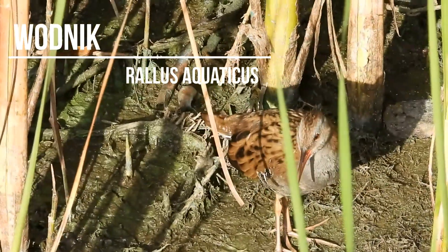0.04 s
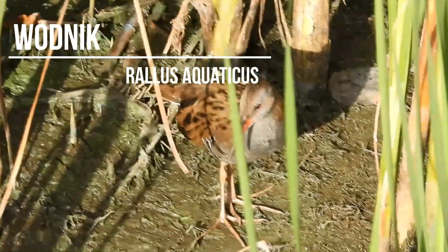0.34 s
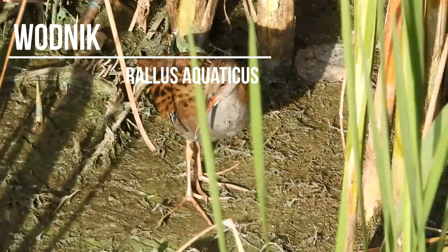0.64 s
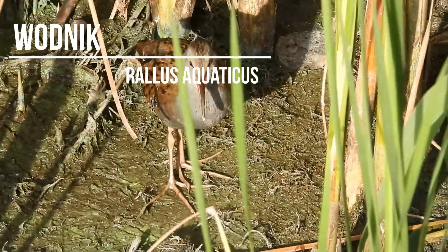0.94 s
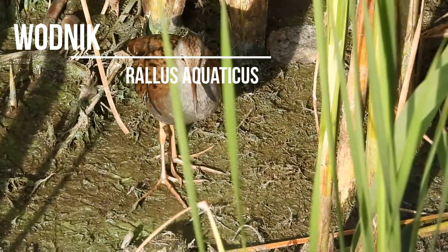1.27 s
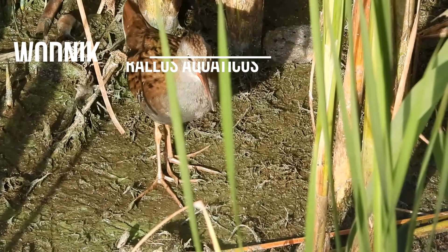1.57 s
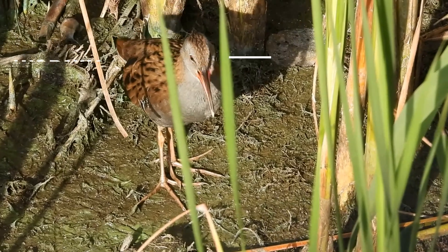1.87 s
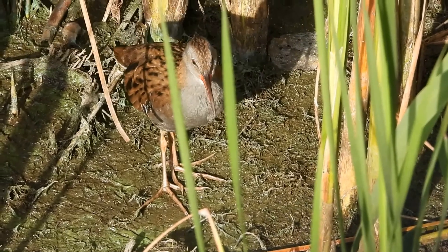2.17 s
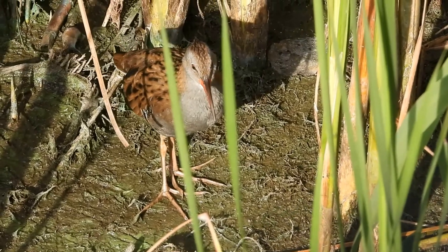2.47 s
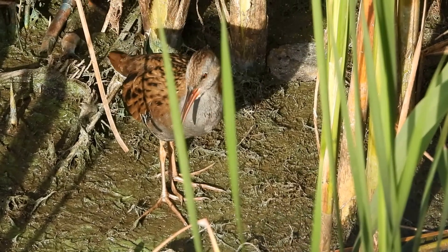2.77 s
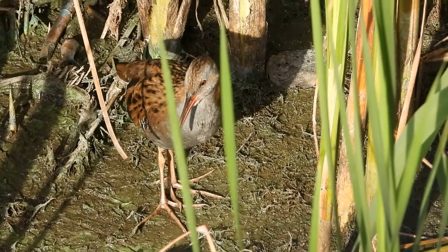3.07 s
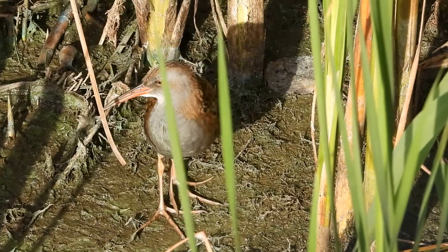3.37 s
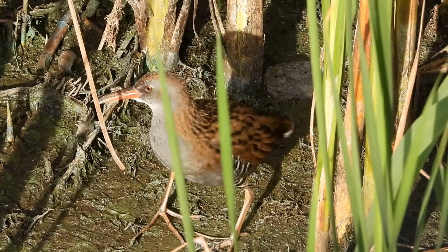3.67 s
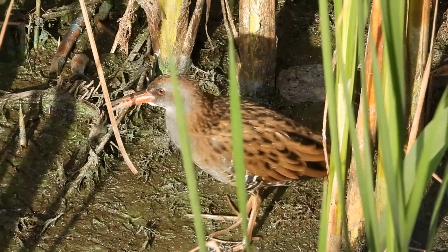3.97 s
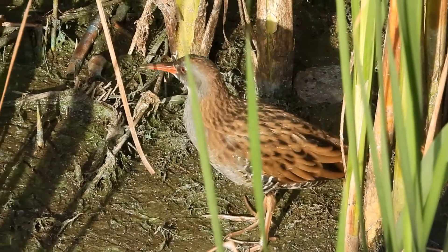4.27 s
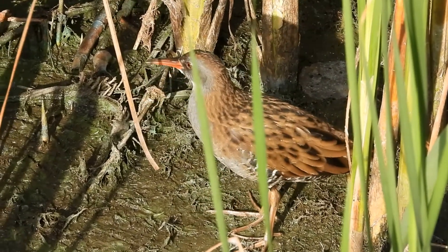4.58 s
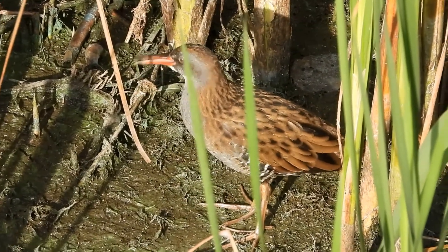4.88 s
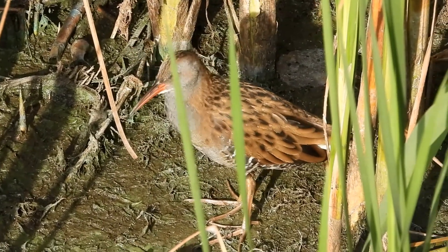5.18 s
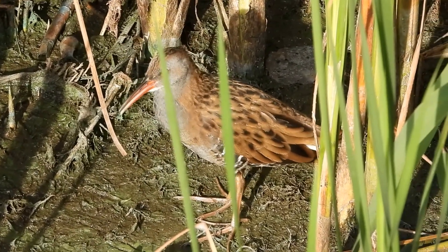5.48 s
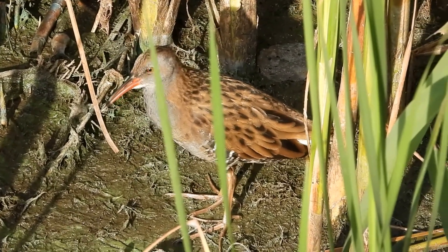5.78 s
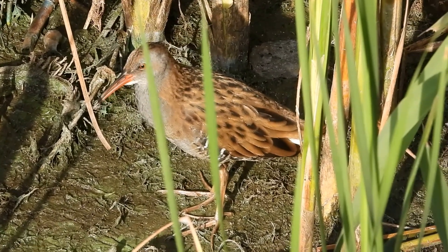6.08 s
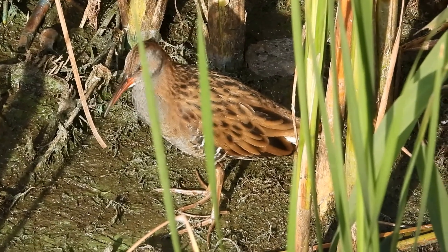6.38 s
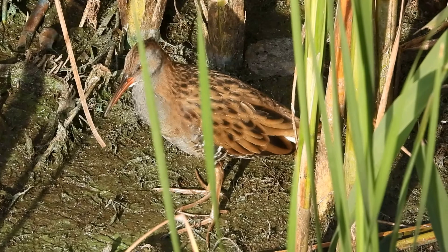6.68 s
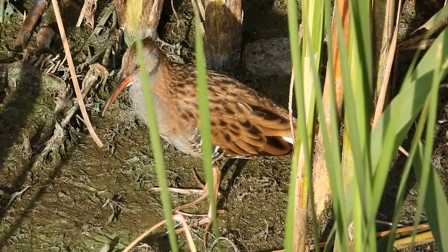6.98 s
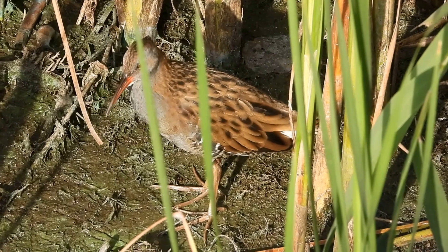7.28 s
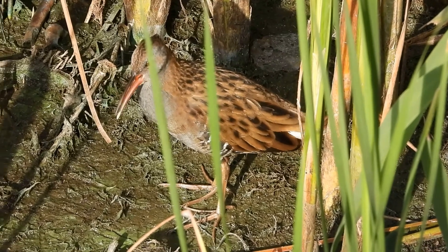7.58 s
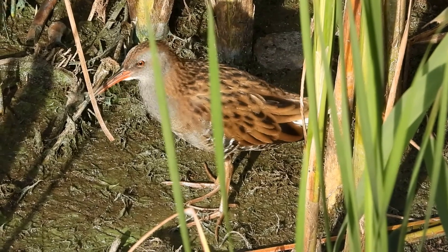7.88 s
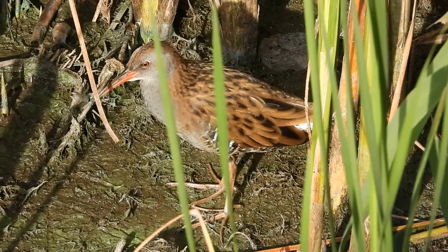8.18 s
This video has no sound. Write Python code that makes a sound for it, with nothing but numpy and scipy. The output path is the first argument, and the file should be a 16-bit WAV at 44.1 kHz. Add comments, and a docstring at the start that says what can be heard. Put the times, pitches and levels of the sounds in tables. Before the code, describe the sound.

A marsh bird close to the microphone gives short, sharp, high chips, about two a second with a few gaps, each ringing briefly in the reeds. The chips grow weaker and sparser toward the end. Beneath them lie a soft, low rush of air and faint rustling. Distant birds yelp and squawk roughly, a dry stem snaps once midway, and thin sliding whistles come near the end.

```python
"""A water rail, a marsh bird, gives a run of sharp chips on a muddy reed edge. Each chip is a short
whistle that arches in pitch, bounces off nearby stems and rings on in the reeds.
Under it lies a soft, low rush of open air. Farther off, other birds yelp faintly, squawk with
rough voices and whistle thin notes. Midway, a dry stem snaps once."""
import sys
import numpy as np
from scipy import signal
from scipy.fft import rfft, irfft, next_fast_len
from scipy.io import wavfile
from scipy.ndimage import uniform_filter1d, map_coordinates

SR = 44100
rng = np.random.default_rng(int(sys.argv[2]) if len(sys.argv) > 2 else 0)


def dump(signal):
    """Clip the signal to [-1, 1] and save it as 16-bit WAV at the path in sys.argv[1]."""
    limited = np.clip(np.atleast_2d(signal).T, -1, 1)
    pcm = np.round(limited * 32767).astype(np.int16)
    wavfile.write(sys.argv[1], SR, pcm)


N = 367794

# tone colour of the reed bed's rush, and of very distant calls: (frequency [Hz], level [dB])
RUSH_COLOUR = [(100, -37.5), (300, -7), (520, -1), (950, 2.5), (1400, -1), (2000, -6.5), (2700, -17),
               (4500, -17), (7000, -36), (16000, -70)]


def amp(db):
    """Turn decibels into a gain."""
    return 10 ** (np.asarray(db) / 20)


def unit(x):
    """Scale a signal to an average power of 1."""
    return x / np.sqrt(np.mean(x ** 2) + 1e-20)


def along(points, hz):
    """Read between (frequency, value) points on a logarithmic frequency axis."""
    frequencies, values = np.transpose(points)
    return np.interp(np.log(hz + 1), np.log(frequencies + 1), values)


def wobble(rate, size):
    """A smooth curve through `rate` random values a second."""
    values = rng.standard_normal(int(size * rate / SR) + 4)
    return map_coordinates(values, [np.arange(size) * rate / SR])


def filtered(x, response):
    """Scale each frequency in x by response(hz)."""
    n = x.shape[-1]
    padded = next_fast_len(n + 8192)
    return irfft(rfft(x, padded) * response(np.fft.rfftfreq(padded, 1 / SR)), padded)[..., :n]


def noise(colour, size):
    """Noise of power 1 with the given tone colour."""
    return unit(filtered(rng.standard_normal(size), lambda hz: amp(along(colour, hz))))


def add(track, start, sound):
    """Mix a sound into the track from `start` seconds on."""
    i = round(start * SR)
    sound, i = sound[..., max(-i, 0):], max(i, 0)
    track[:, i:i + sound.shape[-1]] += sound[..., :max(N - i, 0)]


def panned(x, pan_db):
    """Make the left side pan_db louder than the right."""
    return x * amp([[pan_db / 2], [-pan_db / 2]])


def arch(u, top_hz, crest=0.48, creep=0.018, fall=0.23, deepest=0.17, jitter=0.0026):
    """A chip's pitch creeps up to its crest, then falls; u runs from 0 to 1 over the chip."""
    drop = creep * np.clip(1 - u / crest, 0, 1) ** 2  # share of the top pitch
    drop += deepest * np.tanh(fall * np.maximum(u - crest, 0) ** 2.85 / deepest)
    # the voice frays in pitch and strength as it falls
    pitch = top_hz * (1 - drop) * (1 + jitter * (1 + 55 * drop) * wobble(900, len(u)))
    phase = 2 * np.pi * np.cumsum(pitch) / SR
    strength = amp(np.minimum(45 * drop, 5) * wobble(600, len(u)))
    # the falling end spills sideways into the reeds, so the echo is lower than the chip
    spill = amp(60 * np.minimum(drop, .12))
    return phase, strength, spill


def swell(u, start, attack, release, loss_db):
    """A chip grows, holds, then fades ever faster; times are shares of its length."""
    rise = np.sin(np.pi / 2 * np.clip((u - start) / attack, 0, 1)) ** 2
    return rise * amp(-loss_db * np.maximum(u - release, 0) ** 2)


def rail(second_db=-12.5, second_pan_db=-3, beat_hz=121, beat_db=-29.5, rasp_db=-46):
    """The near bird whistles its chips; the overtones trail the base tone by about 0.01 s."""
    # the chips; the first comes before the start, so only its echo is heard: (overtone start [s],
    # length [s], base tone lead [s], top pitch [Hz], strength [dB], 3rd harmonic [dB], pan [dB])
    chips = [(-.19, 0.031, .011, 3222, 4.5, -25.5, 0), (0.6091, 0.028, 0.011, 3071, -6, -25, 0),
             (1.056, 0.0256, 0.011, 3170, -1.5, -24.5, -1.5), (1.512, 0.0236, 0.0116, 3147, -5, -30.5, 1.3),
             (2.0263, 0.026, 0.0113, 3144, -4, -29, .5), (2.8769, 0.026, 0.0087, 3064, -7.5, -27, -0.5),
             (3.249, 0.027, 0.0118, 3146, -4, -31, 1.5), (3.6914, 0.03, 0.0168, 3273, -4.5, -30, 4.5),
             (4.1186, 0.024, 0.0095, 3101, -5.5, -28, -0.6), (4.981, 0.024, 0.0126, 3141, -5, -37.5, 2),
             (5.3865, 0.0242, 0.0121, 3128, -6, -30, 1.3), (5.6431, 0.0229, 0.0082, 3104, -6.5, -28, 5.3),
             (6.0025, 0.026, 0.012, 3044, -13, -28, -3.1), (6.6387, 0.027, 0.012, 2978, -19, -31, 1),
             (7.7458, 0.028, 0.014, 2991, -19, -28.5, -3.5)]
    # swirling breath in a chip: (frequency [Hz], level [dB])
    breath_colour = [(800, -13.5), (3000, -7), (5000, 1.5), (8000, -11), (15000, -17.5)]
    out = np.zeros((2, N))
    t = np.arange(-SR // 25, SR // 12) / SR
    # the left side leads the right by these angles, in radians
    base_shift, second_shift, upper_shift = np.multiply.outer((0.14, 0.31, 1.3), [[.5], [-.5]])
    for start, length, lead, top_hz, db, third_db, pan_db in chips:
        u = (t + lead) / length
        phase, strength, base_spill = arch(u, top_hz)
        catch = amp(-30) * np.exp(-((u + 0.18) / 0.14) ** 2)  # the voice catches softly first
        body = swell(u, start=0.043, attack=0.306, release=0.7921, loss_db=110.5)
        base_swell = strength * (body + catch)
        base = base_swell * np.sin(phase + base_shift)
        # soft chips flutter against a weak second voice just above the first
        beat = amp(beat_db) * base_swell * np.sin(phase + 2 * np.pi * (beat_hz * t + rng.random()))

        u = t / length
        phase, strength, high_spill = arch(u, top_hz)
        high_swell = strength * swell(u, start=0.0255, attack=0.3142, release=0.8, loss_db=87)
        second = amp(second_db + 0.19 * db) * high_swell * np.sin(2 * phase + second_shift)
        upper = sum(amp(level + 2 * wobble(400, len(t))) * np.sin(k * phase + upper_shift)
                    for k, level in [(3, 0), (4, -18), (5, -28)])
        upper *= amp(third_db) * high_swell ** 1.4  # high overtones need full effort
        rasp = amp(rasp_db + 0.13 * db) * (base_swell + high_swell) / 2 * noise(breath_colour, len(t))
        chip = panned(amp(db) * base + beat + rasp, pan_db) + panned(second, second_pan_db) + upper
        add(out, start + t[0], chip)

        # the reeds get nearly the same base tone whichever way the bill points
        low = amp(0.058 * db) * base_spill * base[0]
        high = np.sqrt(high_spill) * (second[0] + amp(4) * upper[0])
        add(out, start + t[0], stem_echoes(amp(-23) * low + amp(-15) * high))
        add(out, start + t[0], reed_echo(amp(-22) * low + amp(-13) * high))
    return out


def stem_echoes(x, count=7):
    """A few near stems each throw back one weak copy within a few hundredths of a second."""
    out = np.zeros((2, len(x)))
    for late, gain, skew in rng.random((count, 3)):
        for channel, offset in enumerate([0, skew - .5]):
            delay = max(round((0.006 + .024 * late) * SR + 4 * offset), 1)
            out[channel, delay:] += (1 - late / 2) * (.5 + gain) * x[:-delay]
    return out / np.sqrt(count)


def reed_echo(x, near_db=6, near_fade_s=0.11, far_db=-27, far_fade_s=1.0, width=0.56):
    """Countless reeds scatter a sound: a dense near answer, a longer tail and a faint, dull far one."""
    # how long the reeds ring: (frequency [Hz], time to fade by 60 dB [s])
    fade_times = [(1000, 1), (3100, 0.34), (6200, 0.33), (9300, 0.23), (14000, 0.22)]
    hz, t, spectra = signal.stft(rng.standard_normal((2, SR)), SR, nperseg=256)
    near = amp(near_db - 60 * t / near_fade_s)
    tail = amp(-60 * t / along(fade_times, hz)[:, None])
    far = amp(far_db - 60 * t / far_fade_s) / (1 + (hz[:, None] / 6500) ** 4)
    echo = signal.istft(spectra * (near + tail + far), SR, nperseg=256)[1]
    echo *= np.clip(np.arange(echo.shape[1]) / SR / 0.0065, 0, 1) ** 2  # soft start
    mid, side = echo / np.linalg.norm(echo[0])
    return signal.fftconvolve(x[None], np.array([mid + width * side, mid - width * side]), axes=1)


def patchy_noise(colour, patchy_db):
    """Stereo noise that swells in patches; the bass is nearly alike on both sides, the treble smooth."""
    # how alike the air sounds on the left and right: (frequency [Hz], likeness [0-1])
    likeness = [(50, 0.78), (150, 1), (500, 0.89), (1200, 0.77), (5000, 0.32)]
    hz, _, spectra = signal.stft(rng.standard_normal((2, N)), SR, nperseg=1024)
    patches = uniform_filter1d(rng.standard_normal(spectra.shape[1:]), size=4, axis=0)
    patches = unit(uniform_filter1d(patches, size=5, axis=1))
    spectra *= amp(patchy_db * patches / (1 + (hz[:, None] / 3000) ** 2))
    pair = signal.istft(spectra, nperseg=1024)[1][:, :N]

    def mid_and_side(hz):
        angle = np.arccos(np.clip(along(likeness, hz), -1, 1)) / 2
        return amp(along(colour, hz)) * [np.cos(angle), np.sin(angle)]

    mid, side = filtered(pair, mid_and_side)
    return unit(np.array([mid + side, mid - side]))


def air(rumble_boost_db=1, leaves_db=-70, flutter_db=0.9, rustle_db=2.2):
    """A far low rumble, the soft rush of the reed bed and the faint rustle of its dry leaves."""
    # rise and fall of the open air: (time [s], rumble level [dB], rush level [dB])
    levels = [(0, -61, -55.5), (.9, -60.5, -53.5), (1.25, -60, -57.5), (1.7, -62.5, -57.5),
              (2.2, -61, -54.5), (2.55, -59.5, -53.5), (3.2, -61.5, -53.5), (3.75, -63.5, -57.5),
              (4.04, -57.5, -51), (4.25, -58.5, -56.5), (4.75, -60, -54), (5.3, -64, -59.5),
              (5.95, -64, -61), (6.25, -60, -56), (6.62, -60, -54), (7.15, -59, -56), (7.75, -61.5, -54.5),
              (8.34, -58, -55.5)]
    # tone colours of the rumble and the leaves: (frequency [Hz], level [dB])
    rumble_colour = [(25, -27.5), (70, -28), (100, -15.5), (140, -8.5), (175, 0.5), (215, 3), (260, -4.5),
                     (400, -13.5), (700, -27), (2000, -62)]
    leaf_colour = [(1500, -23), (2800, -4.5), (4500, 0), (6300, -2), (8000, -13), (11000, -20),
                   (16000, -37)]
    times, *columns = np.transpose(levels)
    rumble_db, rush_db = [np.interp(np.arange(N) / SR, times, column) for column in columns]
    rumble_db += rumble_boost_db
    rumble = amp(rumble_db + flutter_db * wobble(11, N)) * patchy_noise(rumble_colour, patchy_db=0.93)
    rush = amp(rush_db + flutter_db * wobble(18, N)) * patchy_noise(RUSH_COLOUR, patchy_db=2.4)
    rustle = wobble(10, N) + wobble(120, N)
    leaves = amp(leaves_db + rustle_db * rustle) * patchy_noise(leaf_colour, patchy_db=3.5)
    return panned(rumble + rush + leaves, pan_db=1.1)


def yelps(count=110, level_db=-58, spread_db=2, centre_hz=950, echo_db=-6):
    """Very distant waterbirds yelp; only one tone of each short call carries this far."""
    out = np.zeros((2, N))
    starts = rng.random(count) * N / SR
    traits = np.clip(rng.standard_normal((count, 4)), -1.6, 1.6)
    for start, (pitch, loudness, stretch, glide) in zip(starts, traits):
        half_length = 0.05 * np.exp(0.42 * stretch)
        u = np.arange(-1, 1, 1 / (half_length * SR))
        hz = centre_hz * np.exp(.33 * pitch + .06 * glide * u - .04 * u ** 2 + .014 * wobble(250, len(u)))
        yelp = np.cos(np.pi / 2 * u) ** 2 * np.sin(2 * np.pi * np.cumsum(hz) / SR)
        add(out, start, amp(level_db + spread_db * loudness + along(RUSH_COLOUR, hz)) * yelp)
    return out + amp(echo_db) * reed_echo(out[0])[:, :N]


def squawks(echo_db=-6, rise=0.1, droop=0.046, jitter=0.0054):
    """Harsh far calls: a rising stack of harmonics mixed with noise, both shaped by one throat."""
    # the calls: (middle [s], half length [s], pitch [Hz], level [dB], roughness [1 or more: all noise])
    calls = [(1.273, .05, 1050, -52, 0.64), (1.77, .035, 1011, -45, 0.26), (2.259, .052, 1027, -38.5, 0.16),
             (2.367, 0.12, 826, -46.5, 0.56), (2.513, 0.062, 904, -42.5, 1.07),
             (2.686, 0.066, 1050, -45.5, 0.67), (2.732, 0.037, 1047, -50.5, 0.14),
             (2.84, 0.073, 1063, -50, 0.55), (3.097, .06, 1075, -48.5, 0.7),
             (3.529, .07, 1038, -61.5, 1.15), (3.879, 0.058, 932, -57, 0.7),
             (4.027, 0.092, 996, -55.5, 0.63), (4.216, .05, 1002, -56, 1), (4.684, .05, 800, -54.5, 0.54),
             (6.232, 0.068, 997, -56.5, 0.8), (6.615, .025, 1178, -49, 0.75), (8.118, 0.12, 1107, -57, 1),
             (8.322, 0.081, 1010, -58, 0.8)]
    # tone colour of the throat: (frequency [Hz], level [dB])
    throat = [(500, -24), (1300, -3.5), (2100, 1), (2600, 0.5), (3200, 8), (4300, -1), (5300, -7.5),
              (6500, -20), (9000, -47), (14000, -53.5)]
    out = np.zeros((2, N))
    for middle, half_length, pitch_hz, db, rough in calls:
        u = np.arange(-half_length, half_length, 1 / SR) / half_length
        rough = np.clip(rough, 0, 1)
        pitch = pitch_hz * (1 + rise * u - droop * u ** 2 + jitter * wobble(500, len(u)))
        phase = 2 * np.pi * np.cumsum(pitch) / SR
        voice = unit(sum(amp(along(throat, k * pitch)) ** 1.2 * np.sin(k * phase) for k in range(1, 9)))
        call = np.sqrt(1 - rough) * voice + np.sqrt(rough) * noise(throat, len(u))
        call *= amp(db) * np.cos(np.pi / 2 * u) ** 2.4
        add(out, middle - half_length, call)
        add(out, middle - half_length, amp(echo_db) * reed_echo(call))
    return out


def whistles(echo_db=-7, octave_db=-22, clear_db=-47, scoop_s=0.01, attack_s=0.021, release_s=0.039):
    """Far birds whistle thin, sliding notes; strong ones are clear with an octave, weak ones hoarse."""
    # the notes: (start [s], length [s], pitch [Hz], offset at the start [Hz], glide [Hz/s], level [dB])
    notes = [(3.531, 0.15, 2140, -200, -1800, -55), (4.653, 0.16, 5424, 56, -200, -63),
             (4.798, .115, 7210, -120, 1396, -60), (4.937, 0.054, 4800, 0, -11000, -55.5),
             (5.01, 0.15, 3730, 354, -200, -63.5), (7.853, 0.13, 3620, 0, 6997, -58.5),
             (7.858, 0.081, 3360, 0, -5000, -48.5), (7.918, 0.29, 3533, 350, -650, -46.5),
             (7.934, 0.065, 2850, 0, -2800, -56), (7.936, 0.049, 4340, -4, 1000, -49.5),
             (7.96, 0.14, 5130, -350, -2500, -56), (8.139, 0.147, 4290, -9.5, -4500, -56.5),
             (8.172, 0.074, 4860, 3, -4000, -56), (8.216, 0.078, 4130, 400.5, -2500, -58.5)]
    out = np.zeros((2, N))
    for start, length, pitch_hz, scoop_hz, glide, db in notes:
        t = np.arange(0, length, 1 / SR)
        hoarse = np.clip(amp(clear_db - db), 1, 4)
        pitch = pitch_hz + scoop_hz * np.exp(-t / scoop_s) + glide * t
        pitch *= 1 + 0.0036 * hoarse * wobble(900, len(t))
        phase = 2 * np.pi * np.cumsum(pitch) / SR
        tone = unit(np.sin(phase) + amp(octave_db) / hoarse * np.sin(2 * phase))
        shape = np.minimum(t / attack_s, 1) * np.minimum((length - t) / release_s, 1)
        note = tone * shape * amp(db + wobble(90, len(t)))
        add(out, start, note)
        add(out, start, amp(echo_db) * reed_echo(note))
    return out


def snap(crack_fade_s=0.045, crack_db=-8, ring_db=-10, echo_db=-14, attack_s=0.001605):
    """A dry stem cracks in two steps, dull then bright, and rings briefly."""
    # the stem gives way: (time [s], level [dB], extra ring [dB], treble tilt [dB per octave])
    steps = [(4.445, -27.5, 4.5, -4.5), (4.455, -28.5, -17.5, -0.5)]
    # the stem's ringing tones: (frequency [Hz], level [dB], time to fade by 60 dB [s])
    stem_tones = [(961, -1.5, 0.052), (3030, -15, 0.04), (4574, -2.5, 0.042), (6310, -5, 0.02),
                  (8330, -18.5, .015)]
    # tone colour of breaking fibres: (frequency [Hz], level [dB])
    crack_colour = [(200, -13.5), (900, 7.5), (2500, 3), (6000, 0.5), (9000, -11), (15000, -18.5)]
    out = np.zeros((2, N))
    t = np.arange(SR // 8) / SR
    ring = sum(amp(db - 60 * t / fade_s) * np.sin(2 * np.pi * hz * t) for hz, db, fade_s in stem_tones)
    for start, db, extra_db, tilt_db in steps:
        fibres = noise([(hz, level + tilt_db * np.log2(hz)) for hz, level in crack_colour], len(t))
        crack = amp(crack_db - 60 * t / crack_fade_s) * fibres
        hit = amp(db) * (1 - np.exp(-t / attack_s)) * (crack + amp(ring_db + extra_db) * ring)
        add(out, start, hit)
        add(out, start, amp(echo_db) * reed_echo(hit))
    return out


def limiter(x, ceiling=0.55, release_s=0.13):
    """The volume ducks under loud chips and creeps back, so the air sinks briefly after each."""
    over_db = 20 * np.log10(np.maximum(np.abs(x).max(axis=0) / ceiling, 1))
    recovery = np.exp(-np.arange(N) / SR / release_s)
    held_db = np.maximum.accumulate(over_db / recovery) * recovery
    return x * amp(-uniform_filter1d(held_db, size=300))


def scene():
    """The near rail over the far marsh."""
    return rail() + air() + yelps() + squawks() + whistles() + snap()


def record(dry, lopsided=0.0067, top_hz=15900):
    """A slightly lopsided microphone adds a faint bass bump to chips; a limiter and treble cut follow."""
    return filtered(limiter(dry + lopsided * dry ** 2), lambda hz: hz < top_hz)


dry = scene()
out = record(dry)
dump(out)
```